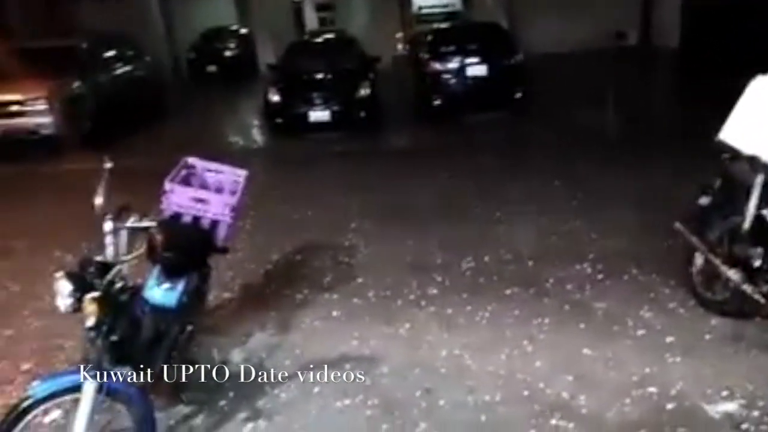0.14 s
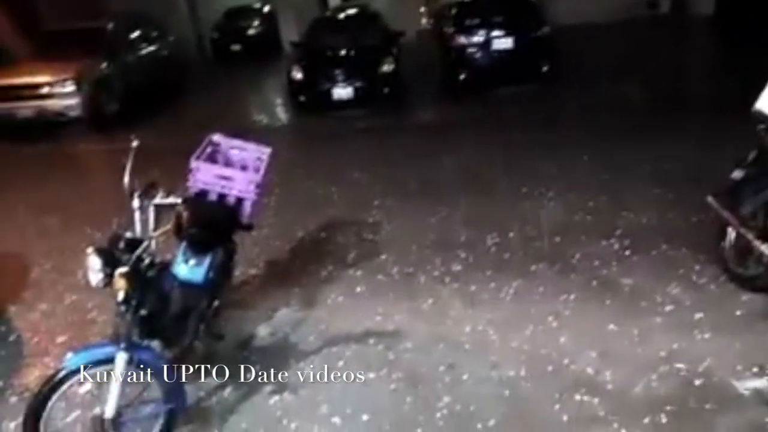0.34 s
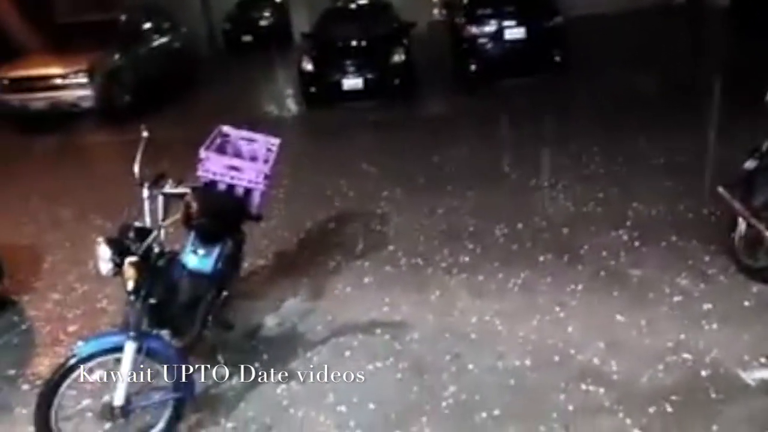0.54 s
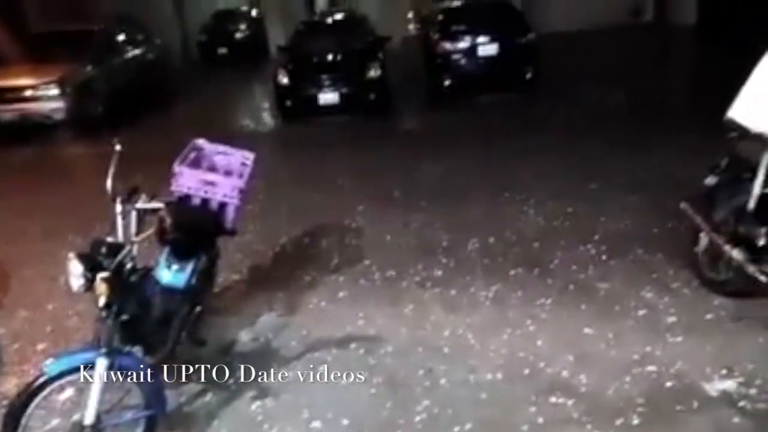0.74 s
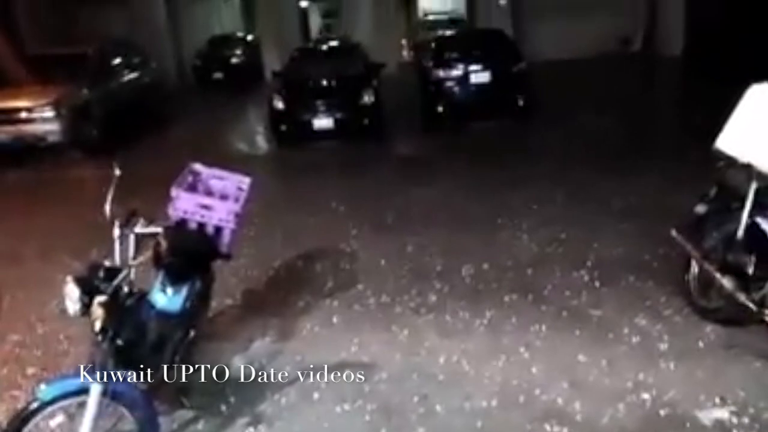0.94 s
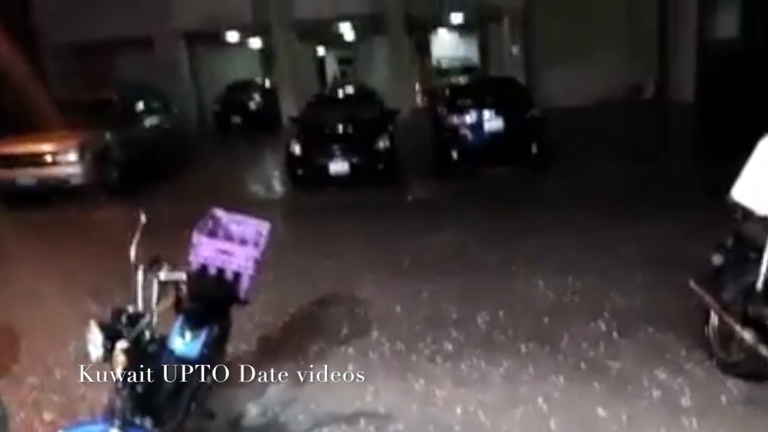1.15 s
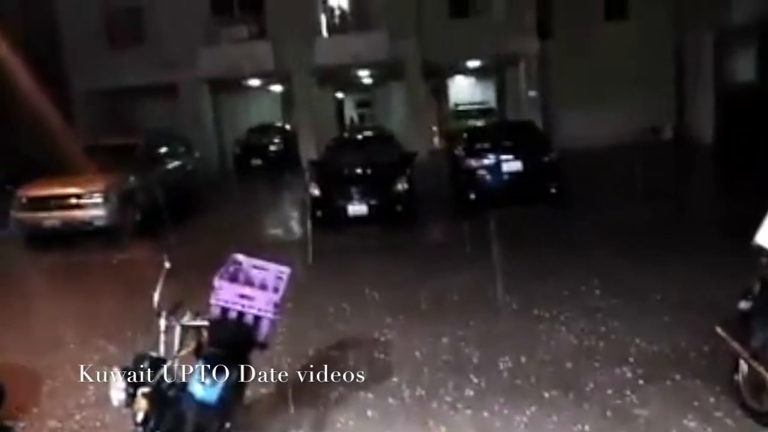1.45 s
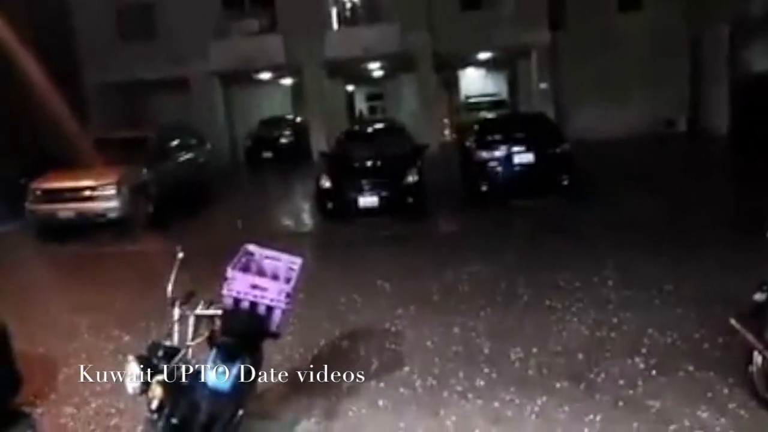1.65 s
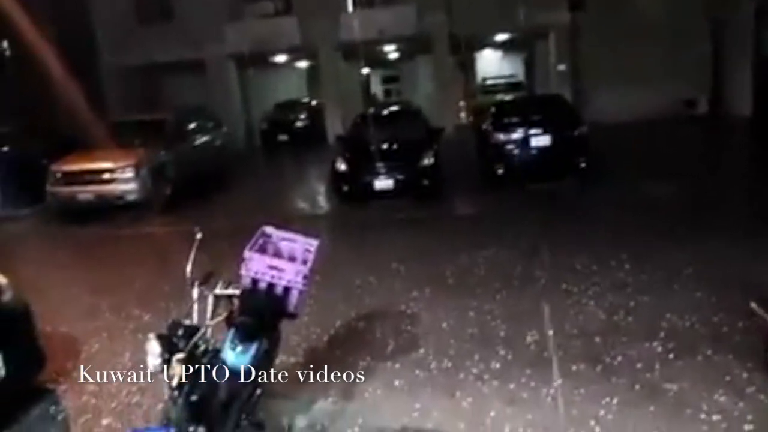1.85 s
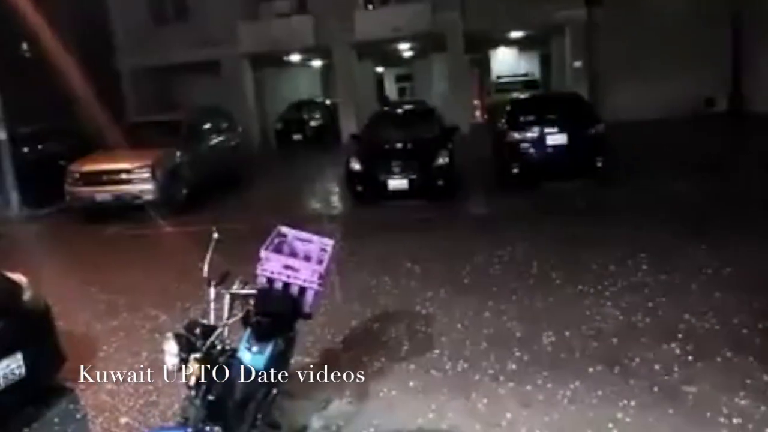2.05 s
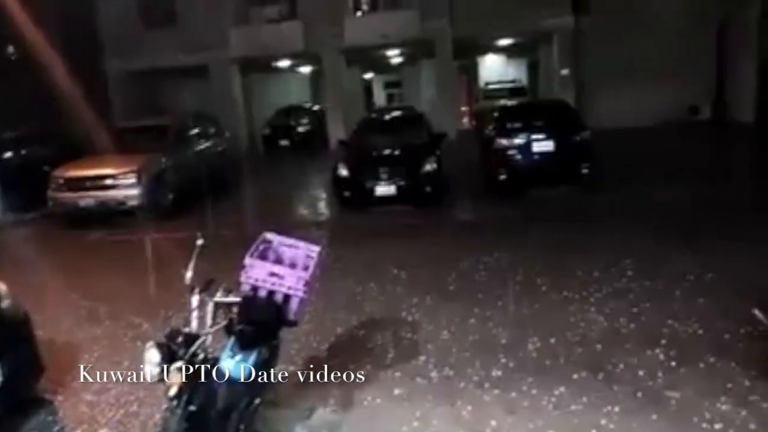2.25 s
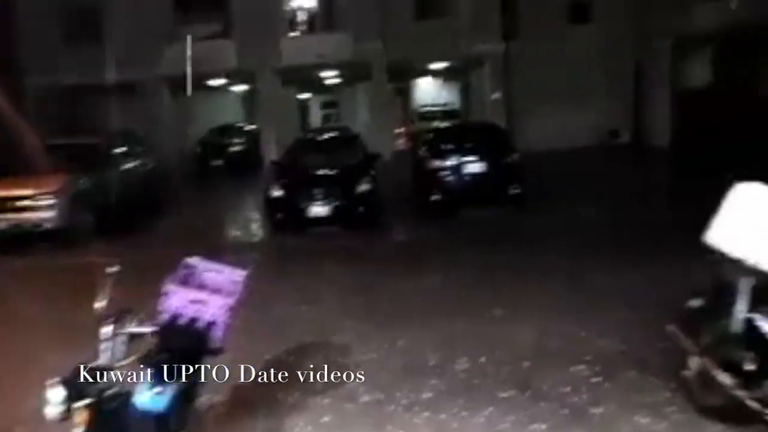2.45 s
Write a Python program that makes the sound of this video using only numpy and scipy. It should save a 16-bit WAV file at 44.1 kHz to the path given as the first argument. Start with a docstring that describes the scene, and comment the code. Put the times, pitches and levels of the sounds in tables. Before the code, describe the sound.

A loud, continuous hail hiss fills an open yard, nearby stones ticking on paving and rattling car panels. The compressed handheld microphone sound falters, losing treble and width late on, then returns bright and wide.

```python
"""A dense hiss of hail, with ticks on paving and knocks on sheet metal: a paved yard with parked cars at night.
Far off, thousands of ice pellets a second merge into coloured noise; nearer stones stay single clicks.
Car panels ring as decaying modes. One handheld microphone hears it all. Stereo is made from its mono sound:
a delayed, smeared copy is mixed in with opposite signs left and right. Twice the sound falters: it turns dull
and mono, with short mutes, then the treble and the width return. The loudest peaks are clipped at the end."""
import sys
import numpy as np
from scipy import signal
from scipy.fft import rfft, irfft
from scipy.io import wavfile
from scipy.ndimage import uniform_filter1d

SR = 44100
rng = np.random.default_rng(int(sys.argv[2]) if len(sys.argv) > 2 else 0)


def waveform_to_disk(signal):
    """Save audio, clipped to [-1, 1], as 16-bit WAV at the path in sys.argv[1]."""
    frames = np.transpose(np.atleast_2d(signal))
    scaled = np.clip(frames, -1, 1) * 32767
    samples = np.round(scaled).astype(np.int16)
    wavfile.write(sys.argv[1], SR, samples)


def amplitude_ratio(level_db):
    """Convert a level in decibels to the matching linear amplitude (field) ratio."""
    exponent = np.asarray(level_db, float) / 20
    return 10 ** exponent


N = 114660  # length in samples


def rms_one(x):
    """Scales a signal to rms 1."""
    return x / np.sqrt(np.mean(x ** 2) + 1e-20)


def at_hz(points, hz):
    """Reads a two-column table on a log-frequency axis."""
    table_hz, values = np.transpose(points)
    return np.interp(np.log(hz), np.log(table_hz), values)


def drift(rate_hz):
    """Slow random wander of spread 1: noise through two equal one-pole lowpasses at rate_hz."""
    hop = 40  # samples between the computed points
    r = np.exp(-2 * np.pi * rate_hz * hop / SR)
    noise = rng.standard_normal(N // hop + 2002)
    slow = signal.lfilter([1], [1, -2 * r, r * r], noise)[2000:]
    return np.interp(np.arange(N) / hop, np.arange(len(slow)), rms_one(slow - slow.mean()))


def impacts(per_s, spread_db, shape):
    """Random clicks of either sign, many small and a few large."""
    size_db = spread_db * np.minimum(rng.exponential(1, shape), 5)
    clicks = amplitude_ratio(size_db) * rng.choice([-1, 1], shape)
    return clicks * (rng.random(shape) < per_s / SR) + 1e-18


def window(start_s, end_s, fade_s=.0006):
    """1 between two times, 0 outside, with short ramps."""
    t = np.arange(N) / SR
    return np.clip(np.minimum(t - start_s, end_s - t) / fade_s + .5, 0, 1)


def bands(hz):
    """Overlapping half-octave weights, each with its centre in Hz."""
    centres = np.log2(30) + np.arange(19) / 2
    place = np.clip(np.log2(hz), centres[0], centres[-1])
    return [(2 ** c, np.cos(np.pi * np.clip(place - c, -.5, .5))) for c in centres]


DULL_CUT_HZ = 4520  # top of the dull sound; the hiss also flickers differently above it

# Colour of the hiss across the yard, relative levels: pitch_hz, level_db (per Hz)
HISS_COLOUR = [(15, -45), (25, -40), (69, -19), (107, -4.5), (152, -3), (322, -4.5), (422, -4), (482, -5),
               (648, -3.5), (804, -6), (895, -4), (1750, -4.5), (2300, -3), (3350, -2.5), (4620, -6),
               (6560, -5), (9300, -9.5), (12200, -9.5), (14300, -17.5), (15500, -17.5)]
# Surges bring heavier, deeper stones: pitch_hz, swing_share (of the fall's swing in dB)
SURGE_SHARE = [(100, 0.48), (400, 0.97), (1400, 1.64), (3200, 0.77), (6000, .4), (12000, .4)]
STONES_PER_S, STONE_SPREAD_DB = 3500, 3
STONE_SHARE = .15  # power share of single stones before colouring
FLICKER_DB, TREBLE_FLICKER_DB = 0.84, 0.7


def hail_hiss(swing_db):
    """Far stones blur to noise, near ones stay clicks; each band flickers on its own and follows the fall."""
    blur = rng.standard_normal((2, N))
    stones = rms_one(impacts(STONES_PER_S, STONE_SPREAD_DB, (2, N)))
    hits = rfft(np.sqrt(1 - STONE_SHARE) * blur + np.sqrt(STONE_SHARE) * stones)
    hz = np.maximum(np.arange(N // 2 + 1) * SR / N, 1)
    colour = amplitude_ratio(at_hz(HISS_COLOUR, hz))
    out = 0
    for k, (centre, band) in enumerate(bands(hz)):
        flicker_db = TREBLE_FLICKER_DB if centre > DULL_CUT_HZ else FLICKER_DB
        level_db = at_hz(SURGE_SHARE, centre) * swing_db + flicker_db * drift(15.0)
        # neighbouring bands draw on different hits
        out = out + irfft(hits[k % 2] * band * colour, N) * amplitude_ratio(level_db)
    return rms_one(out)


# Ringing modes of the car sheet metal, relative levels: pitch_hz, level_db, t60_s
PANEL_MODES = [(291, -11, 0.11), (373, -5, 0.11), (661, -6, 0.038), (999, -2.5, 0.069), (1189, 3, 0.027),
               (1936, 1.5, 0.013), (2235, 7, 0.022), (2601, -2, 0.11), (2992, 1.5, 0.069), (3420, 0, 0.048),
               (3790, 7, .03), (4180, 2.5, 0.015)]
KNOCKS_PER_S, KNOCK_SPREAD_DB = 200, 3.0


def panel_knocks():
    """Stones on cars ring the sheet metal as decaying modes, each with a new strength per hit."""
    hits, out = impacts(KNOCKS_PER_S, KNOCK_SPREAD_DB, N), 0
    for hz, level_db, t60_s in PANEL_MODES:
        r, w = amplitude_ratio(-60 / (t60_s * SR)), 2 * np.pi * hz / SR
        struck = hits * amplitude_ratio(level_db + 4.1 * rng.standard_normal(N))
        out = out + signal.lfilter([0, np.sin(w)], [1, -2 * r * np.cos(w), r * r], struck)
    return rms_one(out)


# Density of the fall over the yard, as level: time_s, level_db
FALL = [(0, -14.5), (.15, -14), (.3, -14), (.5, -13.5), (.63, -14), (.72, -12), (.8, -14.5), (.88, -13.5),
        (1.0, -13), (1.12, -14), (1.21, -11.5), (1.28, -14), (1.361, -12.5), (1.58, -15), (1.72, -13),
        (1.809, -11.5), (1.87, -12.5), (1.93, -10), (2.009, -14.5), (2.15, -13.5), (2.35, -14),
        (2.6, -14.5)]
HISS_DB, KNOCK_DB = 3, -12  # hiss over the mean fall level, knocks over the momentary one


def scene():
    """Hiss and knocks follow the density of the fall; one microphone feeds both channels."""
    fall_db = np.interp(np.arange(N) / SR, *np.transpose(FALL))
    mean_db = fall_db.mean()
    hiss = amplitude_ratio(mean_db + HISS_DB) * hail_hiss(fall_db - mean_db)
    knocks = amplitude_ratio(fall_db + KNOCK_DB) * panel_knocks()
    return np.array([hiss + knocks, hiss + knocks])


LONG_DELAY_TOP_HZ = 13125  # top of the widener's long delay; the gaps are broader above it

# How often narrow bands drop out: pitch_hz, time_share
GAP_SHARE = [(300, .005), (1500, 0.044), (2500, 0.083), (4400, .08), (5000, .01), (13000, 0.018),
             (14000, .25), (15100, 0.31), (15400, .7)]
GAP_HZ, TOP_GAP_HZ, GAP_S = 70, 400, .09  # smoothing widths and length of the gap pattern
GAP_DB, WAVER_DB = -22, 1.41  # level inside the gaps, unevenness around them


def narrow_gaps(mono):
    """Thin bands of the sound waver and drop out for a moment, most often at the very top."""
    hz, t, cells = signal.stft(mono, SR, nperseg=2048, noverlap=1536)
    chance = uniform_filter1d(rng.standard_normal(cells.shape), max(int(GAP_S / t[1]), 1), axis=1)
    low, top = (rms_one(uniform_filter1d(chance, max(int(width / hz[1]), 1), axis=0))
                for width in (GAP_HZ, TOP_GAP_HZ))
    field = np.where(hz[:, None] < LONG_DELAY_TOP_HZ, low, top)
    share = np.clip(at_hz(GAP_SHARE, np.maximum(hz, 1)), 1e-3, .9)
    threshold = np.log(share / (1 - share)) / 1.7  # near the normal quantile of the share
    gain_db = np.where(field < threshold[:, None], GAP_DB, WAVER_DB * field)
    return signal.istft(cells * amplitude_ratio(gain_db), SR, nperseg=2048, noverlap=1536)[1][:N]


# Allpasses that smear the late copy: delay_steps, feedback, phase_turn (in pi per strip)
SMEARS = [(3, .65, .43), (4, .56, .75), (5, .49, .347)]
STEP_S, STRIP_HZ = 1 / 750, 375  # time step and strip width of the smear
SMEAR_TOP_HZ = 8625  # plain delays above
DIFFUSE_SHARE = .3  # power share of the late copy with scattered phases


def late_copy(hz):
    """Response of the late copy: allpass smear, then plain delays above it, partly scattered in phase."""
    step, strip = np.exp(-2j * np.pi * hz * STEP_S), hz // STRIP_HZ + .5
    fading = np.clip(1 - (strip - 3.5) / 20, 0, 1)  # feedback weakens with pitch
    smear = step ** 2
    for steps, feedback, turn in SMEARS:
        late = step ** steps * np.exp(-1j * np.pi * turn * strip)
        smear = smear * (late - feedback * fading) / (1 - feedback * fading * late)
    plain = np.where(hz < LONG_DELAY_TOP_HZ, step ** 14, step)
    smear = np.where(hz < SMEAR_TOP_HZ, smear, plain)
    scattered = np.exp(2j * np.pi * rng.random(len(hz)))
    return np.sqrt(1 - DIFFUSE_SHARE) * smear + np.sqrt(DIFFUSE_SHARE) * scattered


# Balance of the two sides: pitch_hz, left_over_right_db
LEAN = [(60, 0.5), (130, 0), (400, -2), (800, 0), (1250, -1.5), (2200, 2), (4000, 2.5), (7000, 4),
        (8500, 2.5), (8700, -2.5), (15000, -4)]
# Likeness of the two sides, 1 is mono: pitch_hz, likeness
LIKENESS = [(60, .92), (130, .96), (290, .88), (640, .64), (1410, .16), (2600, .24), (4200, .03),
            (15000, 0)]
WANDER_DB, WIDTH_WANDER = 1.5, 0.081  # how far each band's lean and likeness stray


def widen(mono, width):
    """A late, smeared copy is taken from the left and added to the right, band by band."""
    hz = np.maximum(np.arange(N // 2 + 1) * SR / N, 1)
    smear = late_copy(hz)
    lean = amplitude_ratio(at_hz(LEAN, hz) * np.array([[.5], [-.5]]))
    lean = lean / np.sqrt(np.mean(lean ** 2, axis=0))
    sides, out = rfft(mono) * lean, 0
    for centre, band in bands(hz):
        now = irfft(sides * band ** 2, N)
        late = irfft(sides * band ** 2 * smear, N)
        alike = np.clip(at_hz(LIKENESS, centre), 0, 1)
        alike = np.clip(alike + WIDTH_WANDER * (1 - alike) * drift(4.3), -1, 1)
        angle = width * np.arccos(alike) / 2
        stray = amplitude_ratio(WANDER_DB * drift(7.4) * [[.5], [-.5]])
        out = out + stray * (np.cos(angle) * now + np.sin(angle) * late * [[-1], [1]])
    return out


# Stretches where the sound is dull and mono: start_s, end_s
DULL = [(.7725, .787), (1.772, 2.067)]
# Short mute of both sides: start_s, end_s
BOTH_MUTED = (1.7635, 1.772)
RIGHT_MUTED_S, MUTE_DB = .0052, -30  # the right side is mute just before the treble returns
THIN_S, THIN_HZ, WIDEN_S = .0085, 1250, .04  # on return: no bass at first, width grows back


def falter(mono):
    """Wide sound is broken by dull mono stretches with mutes; on return it is thin, then widens."""
    dull = signal.sosfiltfilt(signal.ellip(8, .2, 55, DULL_CUT_HZ, fs=SR, output="sos"), mono)
    t, mute = np.arange(N) / SR, 1 - amplitude_ratio(MUTE_DB)
    width = np.ones(N)
    for start, end in DULL:
        width = width * np.where(t > start, np.clip((t - end) / WIDEN_S, 0, 1), 1)
    x = widen(mono, width)
    thin = signal.sosfilt(signal.butter(8, THIN_HZ, "high", fs=SR, output="sos"), x)
    for start, end in DULL:
        x = x + window(end - THIN_S, end + THIN_S, fade_s=.002) * (thin - x)
        x = x + window(start, end) * (dull - x)
        x = x * [np.ones(N), 1 - mute * window(end - RIGHT_MUTED_S, end)]
    return x * (1 - mute * window(*BOTH_MUTED))


CUTOFF_HZ, RUMBLE_CUT_HZ = 15380, 53
OVERLOAD = 1.0  # clipping level, full scale


def band_limit(x):
    """A steep low-pass at the top of the band."""
    return signal.sosfilt(signal.butter(12, 15660, fs=SR, output="sos"), x)


def record(dry):
    """Rumble and top are cut, the sound gets thin gaps, is widened and falters, then peaks are clipped."""
    top_cut = signal.ellip(10, .5, 70, CUTOFF_HZ, fs=SR, output="sos")
    rumble_cut = signal.butter(3, RUMBLE_CUT_HZ, "high", fs=SR, output="sos")
    mono = signal.sosfilt(np.vstack([top_cut, rumble_cut]), dry.mean(axis=0))
    stereo = falter(narrow_gaps(mono))
    return band_limit(np.clip(stereo, -OVERLOAD, OVERLOAD))


dry = scene()
out = record(dry)
waveform_to_disk(out)
```